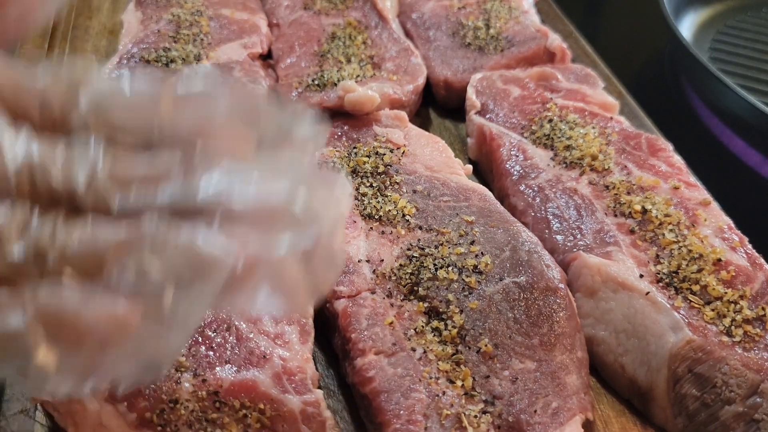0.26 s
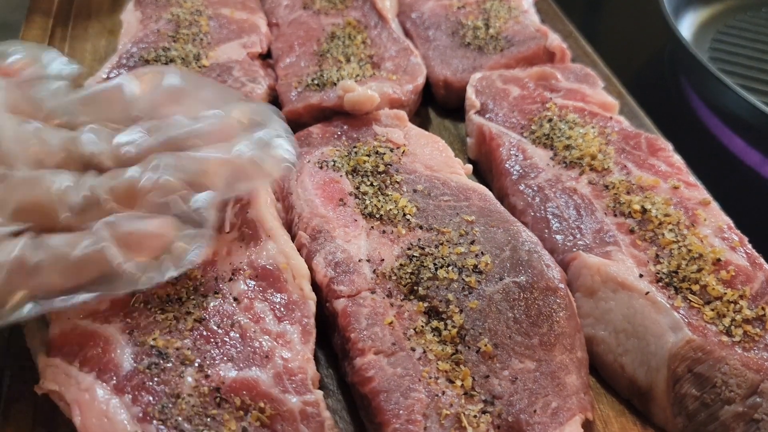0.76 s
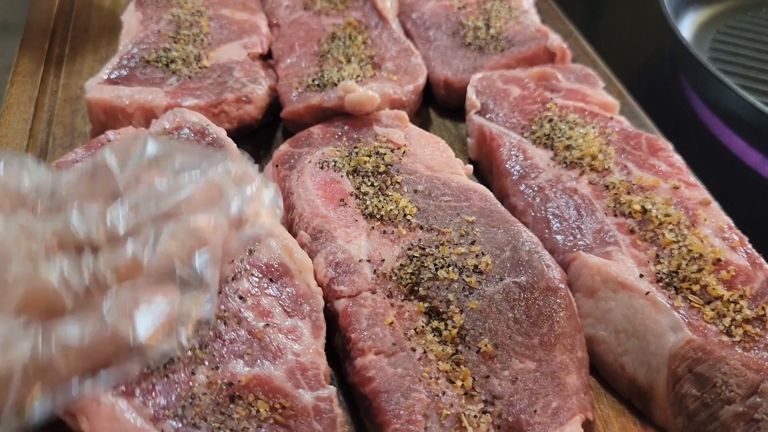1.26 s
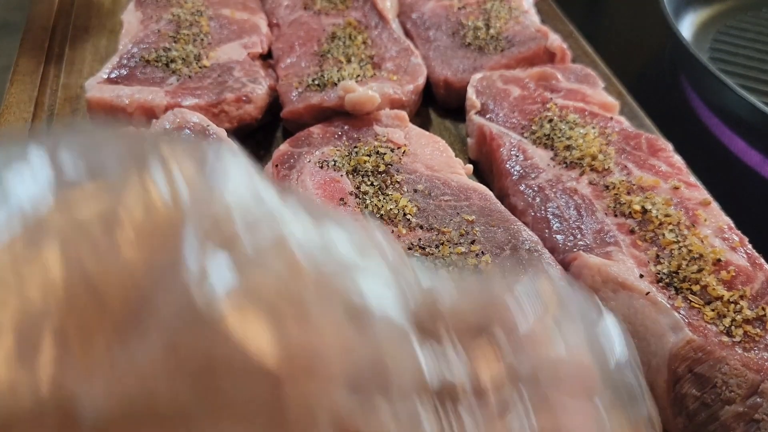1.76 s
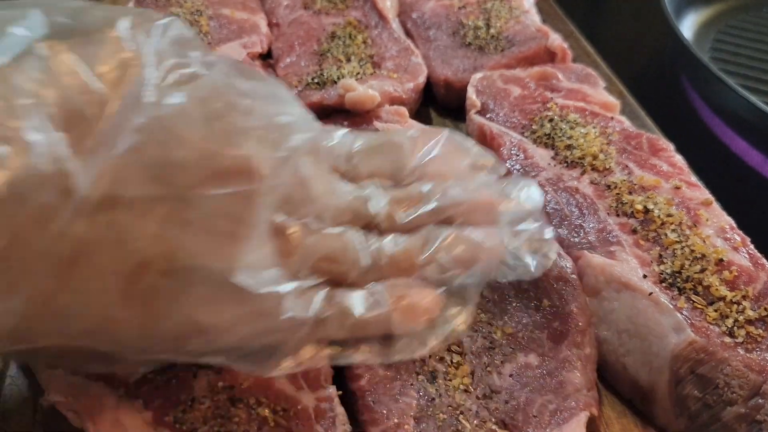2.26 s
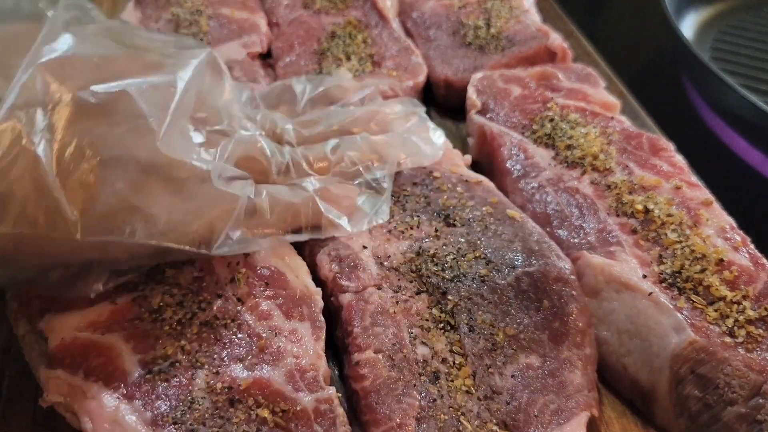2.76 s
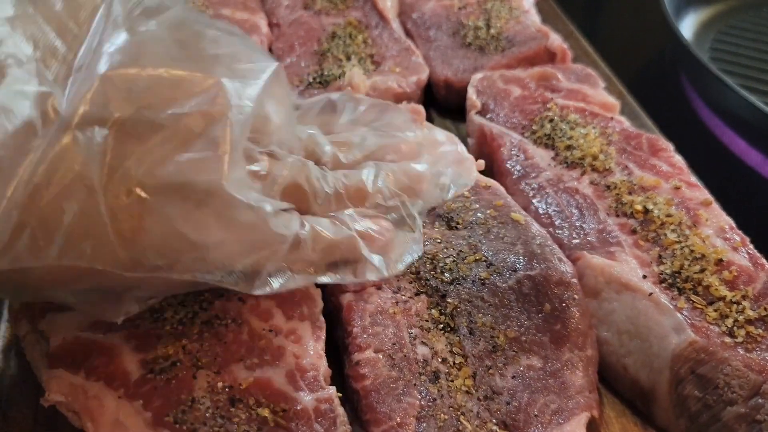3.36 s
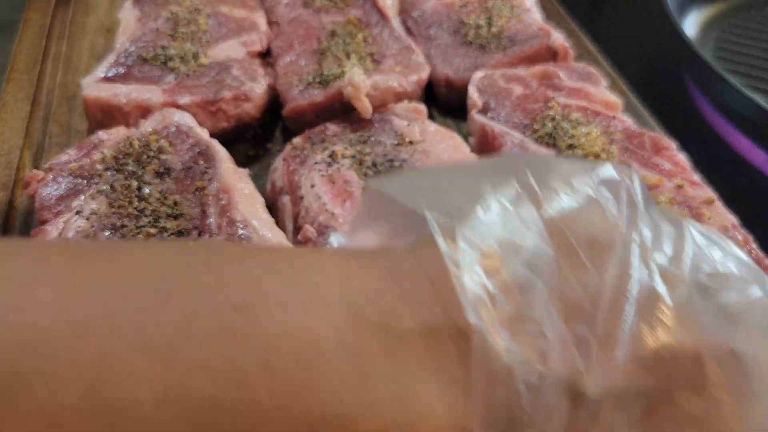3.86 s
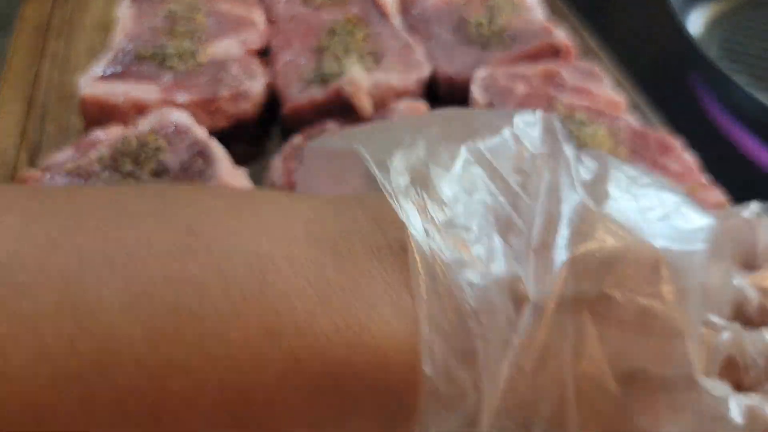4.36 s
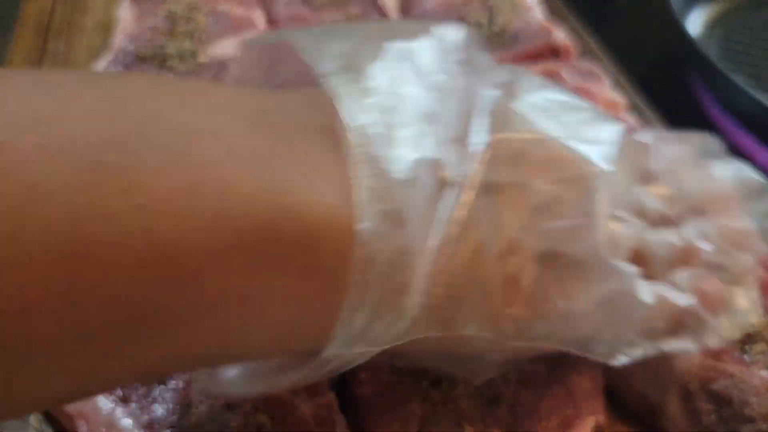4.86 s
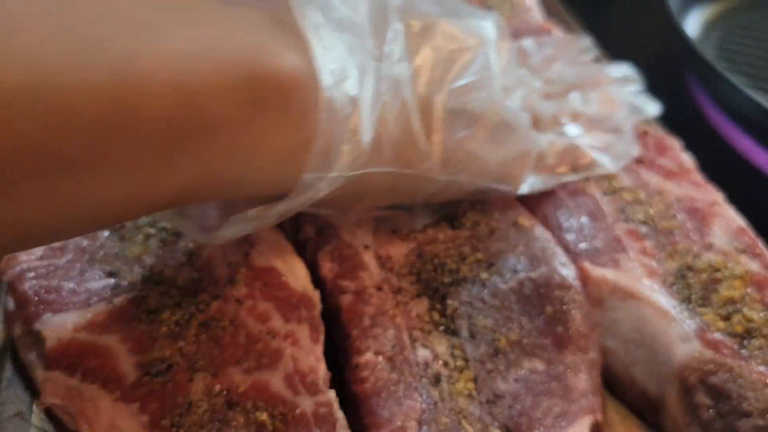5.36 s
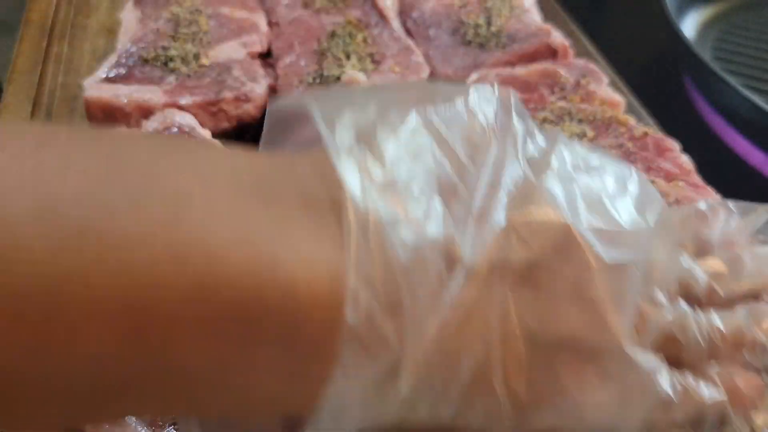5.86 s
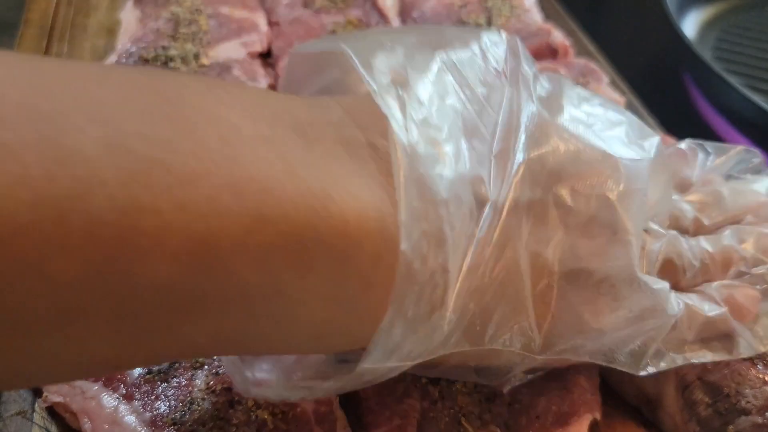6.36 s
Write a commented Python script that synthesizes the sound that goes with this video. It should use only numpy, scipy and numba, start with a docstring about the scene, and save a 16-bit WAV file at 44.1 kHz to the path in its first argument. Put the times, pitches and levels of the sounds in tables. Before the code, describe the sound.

A thin plastic glove crinkles close to the microphone from the start, swelling and easing with each quick stroke as a hand rubs seasoning into raw steaks. A faint gritty scrape of grains runs under the bright crackle. The hand pats the meat sharply at about 0.5 and 0.7 seconds and a little more softly at 0.9, each pat a plastic slap with a moist smack and a dull thump from the wooden board. Single folds snap near 0.6 and 1.5 seconds. Another firm pat lands around 1.6 seconds and a lighter one at 1.9. Uneven rubbing and rustling continue, with light pats near 3.7 and 4.2 seconds. The strokes turn slightly softer in the second half, with a faint pat around 5.8, and carry on until about 6.6 seconds. A kitchen appliance hums low and quietly throughout, and the room adds a short tail.

```python
"""A hand in a thin plastic glove pats raw steaks on a wooden board and rubs in seasoning, heard close up.
The film buckles in countless tiny snaps and grains scrape under the palm, both growing with hand speed.
Each pat slaps the film, squeezes air off the wet meat and thumps the board.
A kitchen appliance hums behind; the walls add a short tail."""
import sys
import numpy as np
from scipy import signal
from scipy.fft import rfft, irfft, next_fast_len
from scipy.io import wavfile
from scipy.ndimage import uniform_filter1d
from numba import njit

SR = 44100
rng = np.random.default_rng(int(sys.argv[2]) if len(sys.argv) > 2 else 0)


def to_wav(sig):
    """Store sig (one row per channel, or 1-D mono) as 16-bit WAV at the path in sys.argv[1].

    Samples outside -1..1 are clipped; the rate is SR.
    """
    pcm = np.clip(np.atleast_2d(sig), -1, 1) * 32767
    pcm = np.round(pcm).astype(np.int16)
    wavfile.write(sys.argv[1], SR, pcm.T)  # frames by channels


N = 291942
TIME_S = np.arange(N) / SR
TOP_HZ = 15600

# appliance motor lines: (frequency [Hz], level [dB])
MOTOR_LINES = [(33, -83), (59.3, -64.5), (119.8, -54.5), (131, -60), (231, -77.5)]
# rush of air: (frequency [Hz], gain [dB])
AIR_SPECTRUM = [(20, -4), (60, -22), (80, -8.5), (130, 1.5), (170, -2.5), (205, -2), (240, 4), (290, -4.5),
                (360, -2.5), (420, -11.5), (900, -24), (2000, -25.5), (15000, -18.5)]
# board and counter modes: (frequency [Hz], gain [dB], t60 [s])
BOARD_MODES = [(58.2, 2.5, 0.27), (80.3, 2, 0.2), (97, 6.5, 0.19), (126.4, -11, 0.28), (182, -7.5, 0.23),
               (246.6, -16.5, 0.27), (359.6, -7.5, 0.093), (458, -11.5, 0.18), (737, -11.5, 0.072)]
# smack of wet meat: (frequency [Hz], gain [dB])
SMACK_SPECTRUM = [(30, -4), (60, 8), (100, 2.5), (200, -3.5), (370, 1), (560, -10), (760, -10.5),
                  (950, -16), (1220, -7.5), (1900, -19.5), (4000, -39), (12000, -47)]
# dragged grains: (frequency [Hz], gain [dB])
SCRAPE_SPECTRUM = [(60, -35), (300, -4.5), (600, -15), (740, -2), (900, -14), (1170, 3), (2000, -5),
                   (3000, -1), (6000, -5.5), (12000, -23)]
# film snaps: (frequency [Hz], gain [dB])
FILM_SPECTRUM = [(60, -57), (400, -3.5), (900, -13), (1600, -7.5), (2400, -3), (3100, 1), (4400, 0.5),
                 (6800, 0), (8000, 1.5), (9000, 4), (11300, 1.5), (13000, 5), (16000, 4.5)]
# papery film resonances: (frequency [Hz], width [Hz], gain [dB])
FILM_RINGS = [(3444, 81, -2.5), (4350, 230, -3.5), (5300, 300, -8), (8900, 210, -16)]
# air pocket under the palm: (time [s], resonance [Hz], gain [dB])
AIR_POCKET = [(0, 1240, -6), (1.05, 1200, -6), (1.68, 1560, -1), (2.5, 1520, -8), (4.3, 1420, -5.5),
              (5.3, 1250, -0.5), (6.62, 1380, -3)]
# hand moving from left steak to right: (time [s], left minus right [dB])
HAND_BALANCE = [(0, 1.5), (1.2, 0.5), (2.2, -0.2), (3.7, -0.6), (6.62, -.9)]
# single folds flipping: (time [s], level [dB])
FOLD_FLIPS = [(0.277, -42), (0.575, -28.5), (1.4885, -29), (2.474, -44), (2.809, -42), (4.47, -42)]
# palm strokes: (start [s], speed-up [s], slow-down [s], rustle [dB], scrape [dB])
PALM_STROKES = [(-.015, .11, 0.14, -38.5, -55), (.25, 0.05, 0.023, -35, -65),
                (0.319, .125, 0.029, -42.5, -59.5), (.441, 0.034, .14, -33.5, -50),
                (.6, 0.044, 0.089, -42, -60), (.685, 0.046, 0.12, -39.5, -52),
                (.77, 0.042, 0.082, -40.5, -55), (.945, 0.097, .14, -36, -52.5),
                (1.153, .085, .14, -36, -54), (1.346, .07, .12, -36.5, -57),
                (1.608, 0.067, 0.12, -37, -45.5), (1.778, .069, 0.031, -36.5, -48.5),
                (1.872, 0.044, .04, -34.5, -49), (1.945, 0.058, 0.2, -38.5, -53.5),
                (2.14, 0.083, 0.08, -36, -50.5), (2.298, 0.067, 0.055, -39, -56),
                (2.396, 0.068, 0.18, -40.5, -53.5), (2.589, 0.057, 0.25, -38.5, -52.5),
                (2.8, 0.027, 0.064, -39, -47), (2.87, 0.056, 0.12, -43, -54),
                (3.005, .1, 0.035, -36.5, -48.5), (3.136, 0.12, 0.026, -37, -52),
                (3.265, 0.035, 0.066, -38, -52), (3.341, 0.031, 0.074, -41.5, -52.5),
                (3.43, .06, 0.068, -39.5, -51), (3.53, 0.026, 0.34, -52, -60),
                (3.69, 0.068, 0.18, -40.5, -49), (3.885, 0.076, 0.15, -45.5, -53.5),
                (4.05, 0.036, 0.21, -42, -52), (4.22, 0.033, 0.28, -46, -52), (4.468, 0.1, 0.38, -46, -58),
                (4.716, 0.087, 0.064, -43, -54), (4.849, 0.04, 0.046, -38.5, -56),
                (4.91, 0.081, 0.23, -43, -59.5), (5.126, 0.21, 0.065, -43.5, -54.5),
                (5.409, .054, 0.075, -44, -53), (5.545, 0.097, 0.022, -47, -55),
                (5.666, 0.12, 0.19, -40.5, -52.5), (5.926, 0.084, .04, -40.5, -56),
                (6.031, 0.045, .13, -39, -49.5), (6.222, 0.025, 0.17, -44, -55),
                (6.435, 0.094, 0.11, -40, -54.5)]
# pats: (time [s], slap [dB], slap rise [s], slap decay [s], smack [dB], smack delay [s], thump [dB])
PALM_PATS = [(.23, -41.5, .0097, .017, -52, .006, -39.5),
             (0.4508, -18.5, 0.0036, 0.017, -26, 0.00024, -23.5),
             (.696, -18, 0.0036, 0.012, -27, 0.00895, -22.5),
             (0.8904, -26, 0.0071, 0.023, -26.5, .012, -29.5), (1.324, -54, .0062, .02, -44, 0.0077, -38.5),
             (1.647, -20, 0.017, .018, -41, 0.0046, -30.5), (1.886, -29.5, .003, 0.021, -55, .004, -44),
             (3.694, -29.5, 0.004, 0.02, -48.5, .008, -40), (4.232, -33.5, 0.0038, 0.031, -50, 0.0051, -51),
             (5.818, -38, 0.0089, 0.043, -50, 0.012, -49)]


def undb(db):
    """Decibels to gain."""
    return 10 ** (np.asarray(db) / 20)


def unit(x):
    """Scale to rms 1."""
    return x / np.sqrt(np.mean(x ** 2))


def curves(rows):
    """Table columns interpolated over time."""
    times_s, *columns = np.transpose(rows)
    return [np.interp(TIME_S, times_s, column) for column in columns]


def colour(x, spectrum):
    """Minimum-phase filter; keeps the power of white noise."""
    hz, db = np.transpose(spectrum)
    bins_hz = np.maximum(np.arange(N // 2 + 1) * SR / N, 1)
    gain = undb(np.interp(np.log(bins_hz), np.log(hz), db))
    cepstrum = irfft(np.log(gain), N)
    response = np.exp(2 * rfft(cepstrum[:N // 2], N))
    return irfft(rfft(x) * unit(response * (bins_hz < TOP_HZ)), N)


def walk(rate_hz):
    """Smooth random drift, rms 1."""
    hold = max(int(SR / rate_hz), 1)
    steps = np.repeat(rng.standard_normal(N // hold + 1), hold)
    return unit(uniform_filter1d(uniform_filter1d(steps, hold), hold)[:N])


def stereo(x, side_db, mono_below_hz=300):
    """Mid and side to left and right; long waves reach both alike."""
    side = signal.sosfilt(signal.butter(1, mono_below_hz, "high", fs=SR, output="sos"), x[1])
    return x[0] + undb(side_db) * side * np.array([[1], [-1]])


def snaps(rate_hz, spread_db, scatter_s=.0008):
    """Random clicks of uneven size, power 1; own lag and polarity per channel."""
    chance = np.clip(rate_hz / SR, 0, 1) * np.ones(N)
    at = np.flatnonzero(rng.random(N) < chance)
    size = unit(undb(spread_db * np.clip(rng.standard_normal(N), -2, 2))) / np.sqrt(chance)
    lags = (scatter_s * SR * (rng.random((2, N)) - .5)).astype(int)
    signs = rng.choice([-1, 1], (2, N))
    return np.array([np.bincount((at + lag[at]) % N, (size * sign)[at], N)
                     for lag, sign in zip(lags, signs)])


def burst(start_s, rise_s, decay_s):
    """Linear rise to 1, exponential decay."""
    age_s = TIME_S - start_s
    return np.clip(age_s / rise_s, 0, 1) * np.exp(-np.maximum(age_s - rise_s, 0) / decay_s)


@njit
def resonate(x, g, k):
    """Swept state-variable band-pass; g: warped frequency, k: relative width."""
    y, band, low = np.zeros(len(x)), 0., 0.
    for i in range(len(x)):
        v = (band + g[i] * (x[i] - low)) / (1 + g[i] * (g[i] + k[i]))
        band, low, y[i] = 2 * v - band, low + 2 * g[i] * v, k[i] * v
    return y


def appliance(waver_db=1.9, waver_rad=.43, air_db=-54.5, pan_db=-1.5):
    """Motor lines waver over a low rush of air, slightly right."""
    hum = sum(undb(db + waver_db * walk(4.52)) * np.sin(2 * np.pi * hz * TIME_S + waver_rad * walk(3.08))
              for hz, db in MOTOR_LINES)
    air = stereo(colour(rng.standard_normal((2, N)), AIR_SPECTRUM), side_db=-9)
    return (hum + undb(air_db) * air) * undb(np.array([[pan_db], [-pan_db]]) / 2)


def room(x, tail_db=-18, t60_s=.4, low_cut_hz=250):
    """Walls add a short diffuse tail above the bass."""
    t = TIME_S[:SR // 2]
    tail = rng.standard_normal((2, len(t))) * np.exp(-np.log(1000) * t / t60_s)
    tail = signal.sosfilt(signal.butter(2, low_cut_hz, "high", fs=SR, output="sos"), tail)
    return x + undb(tail_db) * signal.fftconvolve(x, unit(tail) / np.sqrt(len(t)), axes=1)[:, :N]


def reflections(x, delays_s=(.0012, .006), sway=.1505, gain_db=-14, count=4):
    """Echoes off board, arm and pan; the paths drift as the hand moves."""
    def echoes(channel):
        return sum(np.interp(TIME_S - delay_s * (1 + sway * walk(2.5)), TIME_S, channel)
                   for delay_s in np.geomspace(*delays_s, count))
    return x + undb(gain_db) * np.array([echoes(channel) for channel in x])


def board(lag_s=.0025, build_cycles=2.4, detune=.015, soften_db_per_s=700, gain_db=2.5):
    """Soft meat passes each pat on slowly: low modes swell late; a slow push mostly rocks the lowest."""
    out = np.zeros(N)
    t = TIME_S[:SR // 2]
    hz, mode_db, t60_s = np.transpose(BOARD_MODES)[:, :, None]
    for at_s, *_, delay_s, thump_db in PALM_PATS:
        cycles = hz * (1 + detune * rng.standard_normal(hz.shape)) * t
        drive = undb(mode_db - soften_db_per_s * delay_s * (hz > hz.min()))
        envelope = (1 - np.exp(-cycles / build_cycles)) * np.exp(-np.log(1000) * t / t60_s)
        modes = drive * envelope * np.sin(2 * np.pi * cycles)
        start = int((at_s + lag_s) * SR)
        out[start:start + len(t)] += undb(thump_db + gain_db) * modes.sum(axis=0)[:N - start]
    return out


def meat(squeeze_s=.0021, decay_s=.014):
    """The palm squeezes air off wet meat: a dull smack."""
    push = sum(undb(smack_db) * burst(at_s + delay_s, squeeze_s, decay_s)
               for at_s, *_, smack_db, delay_s, _ in PALM_PATS)
    return stereo(colour(rng.standard_normal((2, N)) * push, SMACK_SPECTRUM), side_db=-1.5)


def seasoning(level_db, gain_db=-2.5, jitter_db=1.64):
    """Grains drag between film and meat."""
    grains = snaps(5000, spread_db=2.7) * undb(level_db + gain_db + jitter_db * walk(60))
    return stereo(colour(grains, SCRAPE_SPECTRUM), side_db=-2.3)


def air_pocket(x, hz, boost_db, width_hz=310):
    """Air between palm and meat resonates."""
    warped = np.tan(np.pi * hz / SR)
    return x + undb(boost_db) * np.array([resonate(channel, warped, width_hz / hz) for channel in x])


def stroke_levels(idle_rustle_db=-55, idle_scrape_db=-65.5, speed_power=.61):
    """Rustle and scrape levels [dB] follow hand speed; the glove never lies quite still."""
    rustle_power, scrape_power = undb(idle_rustle_db) ** 2, undb(idle_scrape_db) ** 2
    for start_s, rise_s, fall_s, rustle_db, scrape_db in PALM_STROKES:
        ramp = np.interp(TIME_S - start_s, [0, rise_s, rise_s + fall_s], [0, 1, 0])
        swell = np.sin(np.pi / 2 * ramp) ** speed_power
        rustle_power += (undb(rustle_db) * swell) ** 2
        scrape_power += (undb(scrape_db) * swell) ** 2
    return 10 * np.log10(rustle_power), 10 * np.log10(scrape_power)


def flex(x, depth_db=.83, rate_hz=22, count=7):
    """Film pockets change shape: each band swells and fades by itself."""
    centres_hz = np.geomspace(1500, 15000, count)
    size = next_fast_len(N)
    bins_hz = np.arange(size // 2 + 1) * SR / size
    spectrum = rfft(x, size)
    bands = (irfft(spectrum * np.interp(bins_hz, centres_hz, row), size)[:, :N] for row in np.eye(count))
    return sum(band * undb(depth_db * walk(rate_hz)) for band in bands)


def film_response(x, taut_db, split_hz=6500):
    """The film rings at a few pitches; taut, it trades middle for treble."""
    x = colour(x, FILM_SPECTRUM)
    x = x + sum(undb(db) * signal.lfilter(*signal.iirpeak(hz, hz / width_hz, fs=SR), x)
                for hz, width_hz, db in FILM_RINGS)
    low = signal.sosfilt(signal.butter(1, split_hz, fs=SR, output="sos"), x)
    return low * undb(-taut_db) + (x - low) * undb(taut_db)


def creases(level_db, rate_hz=150, gain_db=-9.5):
    """Stiffer creases click out of the rustle."""
    return snaps(rate_hz, spread_db=1.7) * undb(level_db + gain_db)


def folds(rise_s=.0012, decay_s=.016):
    """A large fold flips in one short avalanche of snaps."""
    envelope = sum(undb(db) * burst(at_s, rise_s, decay_s) for at_s, db in FOLD_FLIPS)
    return snaps(9000, spread_db=4.3) * envelope


def flutter(gain_db=-19, build_s=.015):
    """Loose film flutters as the hand drops, peaking at each pat."""
    envelope = sum(undb(db + gain_db) * np.exp(-np.abs(TIME_S - at_s) / build_s)
                   for at_s, db, *_ in PALM_PATS)
    return snaps(9000, spread_db=3) * envelope


def slaps(crack_db=-1, crack_s=.001):
    """The palm crushes the film flat; a quicker landing cracks harder."""
    quickest_s = min(rise_s for _, _, rise_s, *_ in PALM_PATS)
    envelope = np.zeros(N)
    for at_s, db, rise_s, decay_s, *_ in PALM_PATS:
        crush = burst(at_s, rise_s, decay_s)
        crack = undb(crack_db) * quickest_s / rise_s * burst(at_s + rise_s / 2, crack_s / 2, crack_s)
        envelope += undb(db) * (crush + crack)
    return snaps(14000, spread_db=4.1) * envelope


def rustle(level_db, peak_rate_hz=10500, gain_db=.78, catch_db=.5, jerk_db=1.38, bunch_db=.13):
    """The film buckles more often under a faster hand, catching and slipping in jerks."""
    crackle = snaps(peak_rate_hz * undb((level_db - level_db.max()) / 2), spread_db=2.5)
    stick_slip_db = catch_db * walk(45) + jerk_db * walk(70) - bunch_db * walk(500)
    return crackle * undb(level_db + gain_db + stick_slip_db)


def glove(pocket_wander=.067, firm_scrape_db=-43.5, rest_taut_db=-.25, drift_db=.56, dull_db=.5):
    """Film and grains sound through the air pocket; pressing dulls the film."""
    rustle_db, scrape_db = stroke_levels()
    pan_db, = curves(HAND_BALANCE)
    pocket_hz, pocket_db = curves(AIR_POCKET)
    pocket_hz *= 1 + pocket_wander * walk(9)
    press = np.clip(undb(scrape_db - firm_scrape_db), 0, 1)
    taut_db = rest_taut_db - drift_db * walk(9.2) - dull_db * press
    crackle = flex(rustle(rustle_db)) + creases(rustle_db) + folds() + flutter() + slaps()
    contact = film_response(crackle, taut_db) + seasoning(scrape_db)
    return air_pocket(contact, pocket_hz, pocket_db) * undb(np.array([pan_db, -pan_db]) / 2)


def scene():
    """Glove, meat and board in front of the appliance."""
    return room(reflections(glove()) + meat()) + board() + appliance()


def record(dry):
    """Steep low-pass at TOP_HZ."""
    return signal.sosfilt(signal.ellip(10, .2, 80, TOP_HZ, fs=SR, output="sos"), dry)


dry = scene()
out = record(dry)
to_wav(out)
```